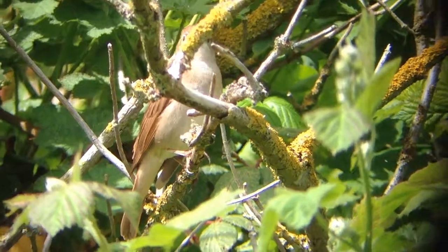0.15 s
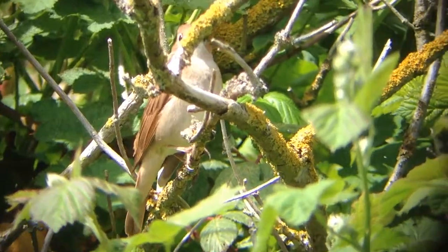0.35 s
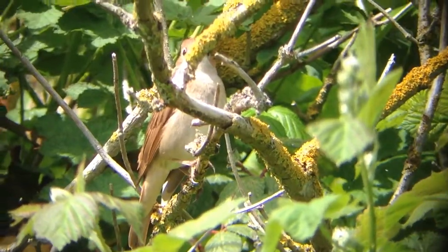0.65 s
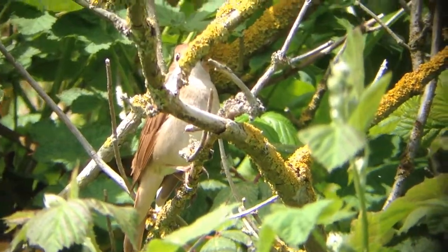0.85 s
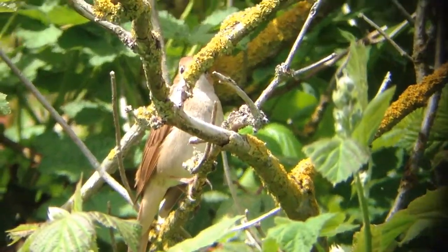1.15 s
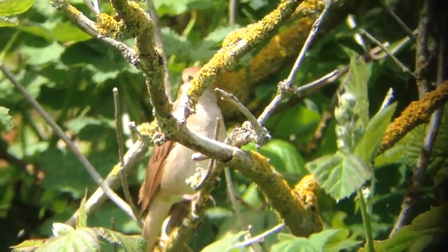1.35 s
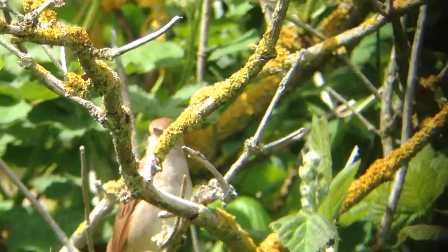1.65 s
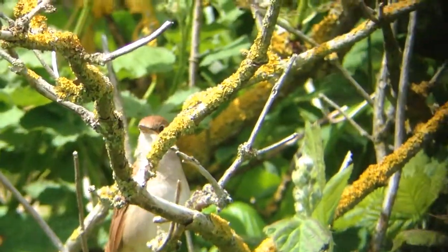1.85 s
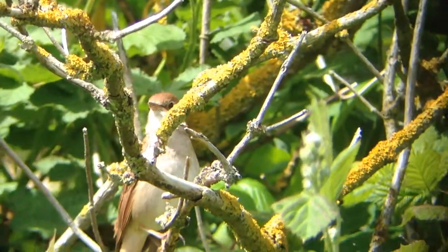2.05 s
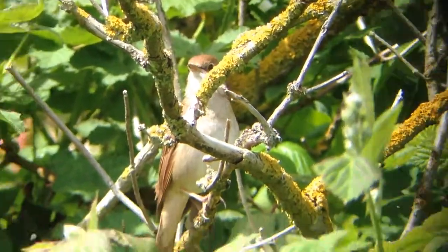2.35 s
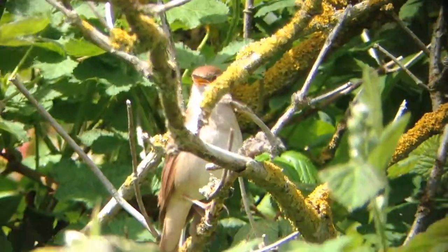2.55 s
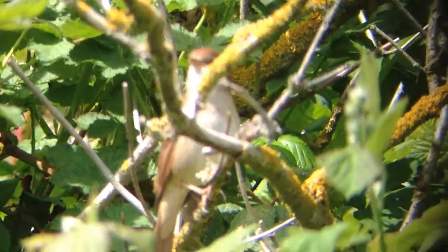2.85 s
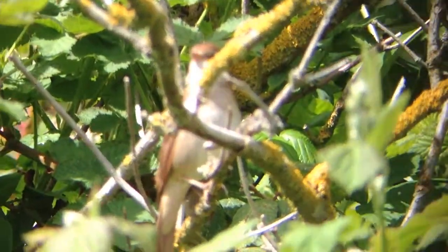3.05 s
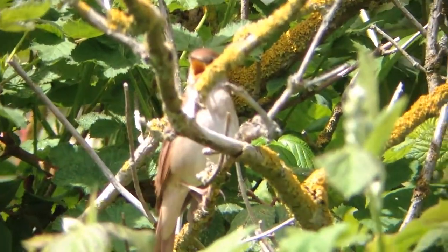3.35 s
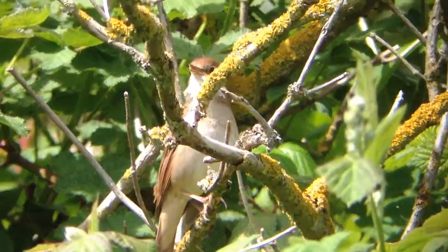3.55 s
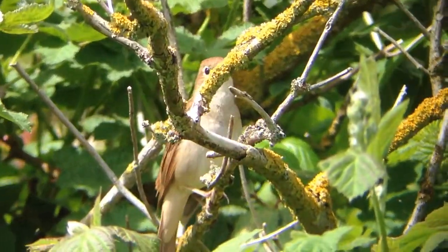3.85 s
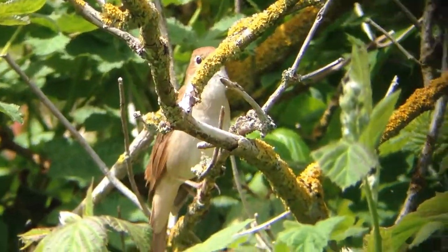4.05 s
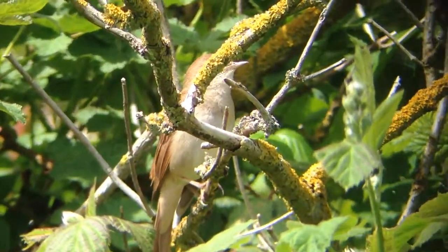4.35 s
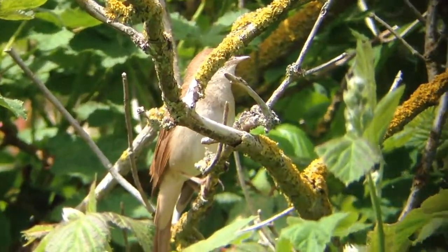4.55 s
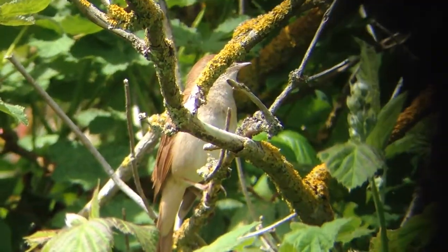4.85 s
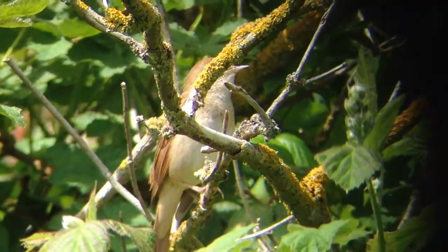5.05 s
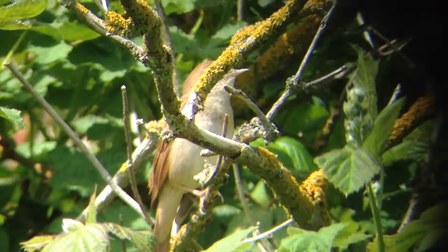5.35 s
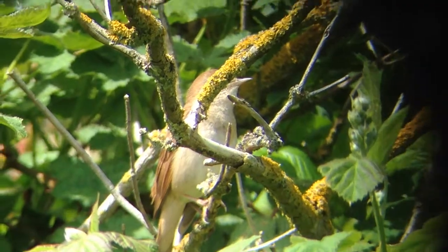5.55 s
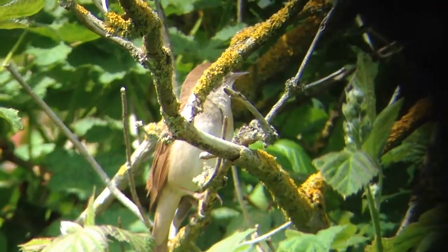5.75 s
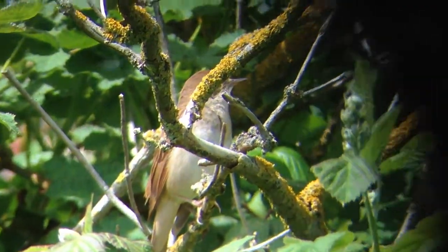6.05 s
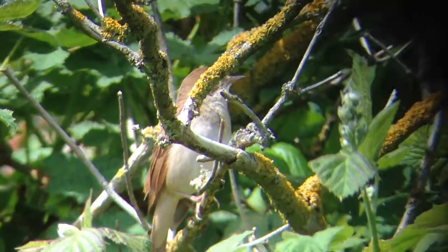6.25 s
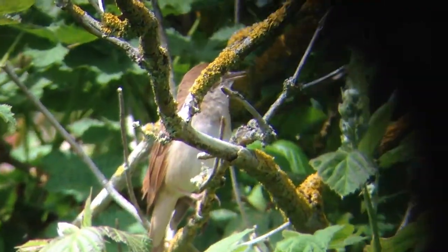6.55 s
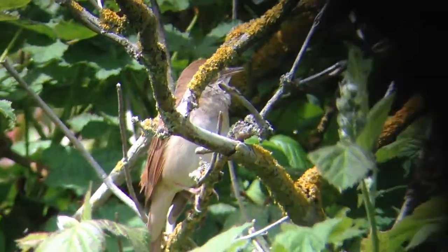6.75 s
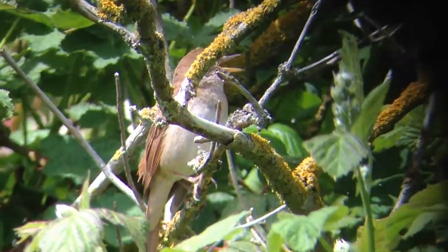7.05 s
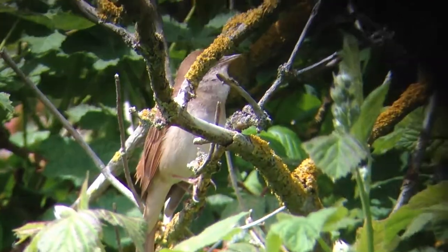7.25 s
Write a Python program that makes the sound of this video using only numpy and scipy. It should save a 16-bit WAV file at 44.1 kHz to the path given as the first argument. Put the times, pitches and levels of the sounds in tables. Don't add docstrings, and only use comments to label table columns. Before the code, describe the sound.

An outdoor thicket with a quiet bed: distant engine drone, soft traffic hush, low wind rumble and slight microphone hiss. At 0 to 0.4 s leaves crackle and rustle lightly; until 2.6 s only faint far birds whistle and chirp, one clearer at 2.2 s. At 2.6 s the nearby nightingale begins with a short, thin rising-falling whistle, then a dry rapid rattle from 2.8 to 3.0 s, a buzz at 3.1 s and a loud snapping upward whistle at 3.2 s. Five scratchy rasps follow at 3.3 to 3.55 s, a low purr at 3.7 s, then four loud, sharp downward double sweeps from 3.8 to 4.15 s and a very high flick at 4.26 s. Short woodland echo trails. From 4.5 to 7.4 s faint distant calls return, with a soft trill at 5.75 s and dull twig ticks near 5.6 and 6.8 s.

```python
import sys
import numpy as np
from scipy import signal
from scipy.fft import rfft, irfft, next_fast_len
from scipy.io import wavfile
from scipy.ndimage import uniform_filter1d, map_coordinates

SR = 44100
rng = np.random.default_rng(int(sys.argv[2]) if len(sys.argv) > 2 else 0)


def attenuation_scalar(level_db):
    decades = np.asarray(level_db, float) / 20
    return 10 ** decades


def bounce(signal):
    frames = np.transpose(np.atleast_2d(signal))
    limited = np.clip(frames, -1, 1)
    pcm = np.round(limited * 32767).astype(np.int16)
    wavfile.write(sys.argv[1], SR, pcm)


N = 326340

# (time [s], pitch [Hz], level [dB])
OPENING = [(2.603, 2627, -70), (2.617, 3100, -61), (2.626, 3650, -58), (2.63, 3900, -44),
           (2.637, 4024, -42), (2.652, 3790, -44), (2.662, 3574, -60), (2.68, 3460, -53), (2.7, 3420, -66)]
OPENING_TAIL = [(2.7, 3420, -70), (2.74, 3440, -66), (2.765, 3150, -66), (2.79, 2713, -74)]
CLIMB = [(3.215, 1780, -50), (3.222, 2190, -42.5), (3.2285, 2480, -35), (3.238, 2700, -43),
         (3.25, 2980, -43.5), (3.259, 3500, -52), (3.263, 3186, -63)]
TUMBLE = [(3.258, 2780, -62), (3.265, 2480, -37), (3.268, 2100, -44), (3.272, 1700, -45)]
SETTLE = [(3.27, 2770, -54), (3.28, 3120, -52), (3.291, 3080, -54), (3.313, 2950, -59)]
FLICK_HIGH = [(4.256, 3730, -55), (4.263, 4650, -44), (4.2675, 5750, -57), (4.271, 6700, -51.5),
              (4.276, 7751, -52.5), (4.282, 7900, -55), (4.29, 7640, -69)]
FLICK_LOW = [(4.267, 3560, -49), (4.273, 4200, -51.5), (4.279, 4840, -42), (4.286, 6000, -51)]
SLIDE = [(5.443, 5300, -72), (5.458, 4350, -66), (5.48, 3420, -58), (5.5, 2660, -60.5), (5.51, 2520, -62)]
PURR_END = [(3.728, 1640, -60), (3.736, 1620, -49), (3.741, 1610, -50), (3.749, 1600, -62)]
# (time after start [s], pitch [Hz], level [dB])
SWEEP_HOOK = [(0, 4600, -15), (.002, 3990, -6.5), (.0062, 3850, -1.5), (.009, 3480, -10.5),
              (.014, 2900, -11.5), (.018, 2600, -3), (.022, 2560, -3), (.027, 2700, -12), (.036, 2750, -19)]
SWEEP_DROP = [(0, 3750, -15), (.004, 3250, -10), (.008, 2930, -8.5), (.012, 2530, 0.5), (.016, 2250, -7.5),
              (.019, 1950, -1.5), (.022, 1740, -14)]
DROP_AFTER_S, LIFT_FADE_S = .034, 0.01124
# (time [s], level [dB], hook start lift [Hz], drop re hook [dB], drop start lift [Hz])
SWEEPS = [
    (3.799, -29, 10, -2.5, 8),
    (3.910, -29.5, 15, -1, -30),
    (4.021, -28.5, 340, -1.5, 300),
    (4.138, -29.5, 300, -4, -60),
]
HOOK_REST_HZ = [10, -55, 100, 45]
# (time [s], length [s], shake rate [1/s], centre [Hz], swing [Hz], level [dB])
PURR = (3.6725, .07, 96, 1712, 175, -39.2)
# (time [s], length [s], pulse rate [1/s], centre [Hz], level [dB])
BUZZ = [
    (3.069, 0.078, 82, 4850, -44.5),
    (3.1, .05, 94, 6250, -60),
    (3.078, 0.068, 66, 3950, -54),
    (3.078, 0.076, 83, 5340, -59),
]
RASP = [(3.335, 0.026, 183, 4630, -56), (3.379, .03, 180, 4350, -56), (3.425, 0.031, 186, 4600, -55.5),
        (3.478, 0.026, 177, 4510, -54.5), (3.528, 0.032, 179, 4660, -56.5)]
TRILL = [(5.735, 0.393, 17.9, 3380, -60)]
# (time [s], tick level [dB], tock level [dB])
RATTLE = [(2.813, -54.5, -63), (2.842, -55, -60), (2.866, -63, -58), (2.890, -59, -56), (2.913, -57, -52),
          (2.938, -57, -53), (2.963, -56, -55)]
TICK_HZ, TOCK_HZ, TOCK_AFTER_S = 2390, 2050, .0052
# (delay [s], level [dB])
BRANCH_ECHOES = [(.0019, -11), (.0043, -1), (.0071, -8), (0.011, -4.5)]

# (time [s], length [s], pitch [Hz], level [dB])
HELD = [(1.02, .04, 3110, -71), (1.055, .035, 3150, -66), (1.872, .014, 5200, -68), (1.96, .02, 4950, -72),
        (1.958, .02, 3900, -69), (2.098, .01, 3150, -65), (2.125, .01, 3650, -69), (2.32, .012, 3170, -68),
        (2.39, .05, 3700, -73), (2.46, .02, 2400, -68), (.645, .03, 3700, -76), (.75, .012, 3450, -65),
        (.773, .01, 2950, -65), (1.27, .11, 4280, -82), (6.955, .015, 2750, -70), (6.455, .035, 2150, -73),
        (6.665, .025, 2000, -69), (1.862, .01, 4300, -69), (1.912, .015, 3700, -65), (1.92, .04, 3450, -72),
        (1.96, .02, 4300, -67), (2.005, .02, 3280, -69), (2.198, .03, 3100, -71), (2.44, .03, 3200, -63),
        (2.869, .03, 3410, -72), (3.1, .08, 3230, -71), (3.287, .05, 4360, -68), (3.369, .07, 3200, -65),
        (3.562, .04, 3370, -62), (3.745, .02, 3350, -68), (3.765, .011, 2790, -65), (6.41, .075, 2700, -73),
        (6.67, .06, 3150, -74), (6.935, .025, 4200, -77), (6.9, .06, 1980, -75), (6.95, .015, 3150, -67),
        (6.986, .035, 2680, -66), (7.02, .04, 2620, -73), (7.353, .045, 3550, -76),
        (7.368, .016, 2600, -68), (7.265, .025, 2050, -72), (.247, .008, 3000, -68), (.133, .02, 2350, -70),
        (.18, .04, 2400, -70), (4.925, .015, 3550, -70)]
# (time [s], length [s], from [Hz], to [Hz],
# level [dB])
GLIDES = [(1.31, .09, 3400, 3280, -78), (1.33, .07, 3850, 3680, -79), (1.729, .014, 4300, 3400, -66),
          (1.781, .016, 4300, 2950, -66), (1.797, .008, 3500, 2900, -73), (1.915, .012, 3800, 2900, -70),
          (6.765, .01, 3000, 2300, -70), (.67, .03, 3400, 2670, -71), (.757, .018, 3500, 2950, -66),
          (2.24, .012, 3900, 3600, -70), (.51, .022, 3000, 2350, -72), (1.88, .022, 5000, 3150, -67),
          (1.9, .022, 3100, 3050, -70), (1.96, .02, 4900, 3700, -72), (2.965, .05, 2880, 2700, -68),
          (3.491, .035, 4500, 4110, -65), (3.598, .035, 3270, 2830, -63), (3.733, .052, 4300, 4000, -68),
          (6.175, .005, 5800, 5300, -73), (6.522, .018, 3550, 3120, -72), (6.592, .01, 3680, 3350, -69),
          (6.714, .022, 4450, 3800, -70), (6.72, .028, 3700, 3100, -66.5), (6.795, .02, 3550, 3250, -73),
          (6.955, .012, 4300, 2500, -71), (7.007, .012, 4300, 2400, -68), (6.345, .012, 4300, 3700, -76),
          (7.196, .068, 3500, 3200, -64),
          (1.41, .08, 3200, 3380, -77), (1.42, .07, 3800, 4000, -82), (7.0, .012, 3900, 4300, -72),
         (.925, .018, 3100, 3500, -72), (.95, .015, 3000, 3350, -72), (.562, .045, 3450, 3500, -76),
         (.605, .028, 3600, 3800, -74), (.674, .008, 4200, 4600, -71), (2.433, .045, 2400, 2800, -70),
         (2.225, .045, 4100, 4400, -73), (6.332, .014, 3200, 4200, -73), (6.503, .01, 3200, 3700, -72),
         (1.765, .016, 4150, 4550, -69), (2.14, .008, 3800, 5300, -69), (2.416, .07, 1740, 2150, -67),
         (3.543, .045, 2580, 2820, -65), (5.27, .03, 2950, 3250, -71), (5.516, .09, 2660, 2970, -75),
         (5.614, .055, 3130, 3440, -63), (5.65, .02, 3680, 3990, -68), (6.137, .007, 4900, 6100, -69),
         (6.166, .008, 5400, 6000, -66), (6.179, .007, 4800, 5400, -70), (6.222, .009, 5150, 5500, -66),
         (6.231, .007, 5550, 6050, -71), (6.246, .007, 5100, 5800, -70), (6.608, .03, 3750, 4100, -72),
         (6.65, .06, 4300, 4200, -79), (6.82, .16, 3080, 3400, -77), (7.15, .02, 2750, 2950, -65),
         (7.169, .012, 3150, 3450, -69), (7.18, .012, 7100, 7800, -76), (7.191, .013, 7800, 8050, -72)]
FAR_HOOKS = [(1.752, .016, 4600, 4200, -66), (1.98, .025, 3800, 3080, -66), (2.085, .014, 3550, 3300, -67),
             (2.2, .022, 2600, 1770, -55.5), (2.278, .055, 3330, 3130, -71), (2.358, .04, 3680, 3400, -71),
             (6.375, .022, 2950, 3300, -61), (6.393, .016, 3400, 2650, -66), (6.665, .015, 3390, 2730, -70),
             (6.991, .025, 2760, 3100, -67)]
HOOK_POWER = 3.5
# (time [s], length [s], foot [Hz], top [Hz], level [dB])
ARCHES = [(.455, .058, 3200, 3650, -72), (1.092, .12, 3070, 3930, -67)]
ARCH_TOP_AT, ARCH_UNDER_HZ = .42, 600
# (time after start [s], length [s], from [Hz], to [Hz], level [dB])
FIGURE = [
    (0, .018, 2950, 4300, -8),
    (.015, .04, 4300, 4250, -9),
    (.086, .026, 3450, 3470, -6),
]
FIGURE_HOOK = [
    (.066, .022, 3950, 3400, 1.5),
    (.027, .03, 4000, 2770, -1),
]
PEAK_UP = [(0.00096, 0.0248, 3100, 4050, -4.5)]
PEAK_DOWN = [(0.02, 0.028, 4020, 3620, 0)]
# (time [s], level [dB])
FIGURES = [(5, -67), (5.143, -65), (5.292, -63.5)]
PEAKED = [(4.688, -68.5), (4.885, -67.5)]

# (time [s], length [s],
# centre [Hz], width [Hz], level [dB])
RUSTLE = [(0, 0.0045, 3900, 1500, -51), (.006, 0.0056, 4100, 1800, -54.5), (.248, .005, 4000, 2500, -68),
          (.036, 0.007, 4500, 3500, -63), (.065, 0.053, 3480, 3500, -63), (0.142, 0.086, 3340, 3000, -63),
          (.184, .006, 3400, 3000, -59), (.29, .075, 4530, 3000, -68), (.298, 0.066, 3270, 1300, -59),
          (.308, 0.028, 2100, 800, -51.5), (.882, 0.0057, 4300, 1500, -64), (4.251, 0.02, 7160, 1300, -54),
          (4.514, 0.0055, 1900, 2500, -59.5), (4.522, .007, 1700, 2000, -57), (6.375, 0.05, 148, 300, -58),
          (6.4, 0.015, 700, 600, -58), (6.665, 0.019, 1500, 1500, -60), (6.765, 0.008, 856, 900, -51.5),
          (6.75, 0.044, 2000, 1800, -63), (2.203, 0.0067, 2150, 600, -58)]
# (time [s], peak level [dB], frequency [Hz])
TICKS = [(5.5751, -39.5, 720), (6.754, -46.5, 600), (6.77, -48, 750), (6.836, -51, 1000)]
TICK_HALF_WIDTH_S = .0008

# (time [s], level [dB])
ENGINE = [(0.0, -67), (0.12, -54), (0.47, -61), (5.98, -56), (7.4, -61)]
# (multiple of firing rate [1], level [dB])
ORDERS = [(1, -10), (2, -24), (3, -3), (4, -5), (5, -1.5), (6, -8), (7, -3), (8, 0.5), (9, -8), (10, -11.5),
          (11, -29)]
FIRING_HZ = 19.94
# (time [s], level [dB])
HUSH = [(0.0, -59), (0.14, -61.5), (0.31, -62.5), (1.13, -62), (2.97, -63), (6.74, -62.5), (7.28, -62.5),
        (7.4, -61)]
GUSTS = [(0.0, -62), (0.16, -54.5), (0.31, -70), (0.64, -64), (0.7, -71), (1.17, -58.5), (1.26, -62),
         (2.31, -68.5), (2.45, -56), (2.49, -70), (3.03, -70), (3.05, -55), (3.36, -67), (3.44, -52.5),
         (3.92, -59.5), (6.51, -59), (7.32, -63), (7.4, -56)]
# (frequency [Hz], density [dB])
TRAFFIC = [(53, -21), (90, -9), (129, -4.5), (323, -9), (470, -9), (1030, -11), (1990, -15.5),
           (2540, -22.5), (3440, -22.5), (4910, -30), (8000, -41.5), (10400, -43), (17600, -120)]
WIND = [(18, -28), (38, -7), (60, -1.5), (90, 2), (170, -9.5), (260, -49)]
# (time [s], length [s], centre [Hz], width [Hz], level [dB])
MURMUR = [(0, .3, 2350, 600, -71), (1.25, .5, 2300, 600, -73), (5.5, .55, 2600, 1000, -68),
          (5.51, .11, 2800, 450, -65), (6.3, .75, 3500, 1800, -73), (3.3, .4, 2500, 1500, -68),
          (2.2, .32, 3800, 1500, -72), (4.2, .25, 3000, 1500, -70), (.6, .2, 4300, 700, -75),
          (1.25, .27, 3800, 1200, -75), (1.0, .2, 80, 60, -60), (5.645, .05, 3300, 1400, -63),
          (6.94, .09, 3200, 1600, -66), (6.355, .06, 3000, 900, -66), (.05, .24, 3300, 2500, -69),
          (2.94, .12, 3000, 800, -68)]
# (time [s], length [s], from [Hz], to [Hz])
MASKED = [(2.635, .05, 4450, 5200), (2.665, .04, 4050, 4650), (3.795, .045, 5250, 5600),
          (3.83, .04, 4300, 4550), (3.908, .052, 4700, 5700), (3.92, .02, 5700, 6700),
          (3.94, .06, 4350, 4600), (4.032, .042, 5200, 6800), (4.04, .015, 6800, 7400),
          (4.045, .065, 4650, 5150), (4.15, .018, 5300, 6800), (4.16, .03, 4800, 5150),
          (4.27, .035, 8200, 8600)]


def unit(x):
    return x / np.sqrt(np.mean(x ** 2) + 1e-20)


def curves(rows):
    s, *cols = np.transpose(rows)
    return [np.interp(np.arange(N) / SR, s, c) for c in cols]


def wobble(rate_hz, size=N):
    knots = rng.standard_normal(int(size * rate_hz / SR) + 4)
    return map_coordinates(knots, [np.arange(size) * rate_hz / SR])


def noise(spectrum):
    f, db = np.transpose(spectrum)
    m = next_fast_len(N)
    hz = np.fft.rfftfreq(m, 1 / SR)
    gain = attenuation_scalar(np.interp(np.log(hz + 1), np.log(f), db, left=-120, right=-120))
    return unit(irfft(rfft(rng.standard_normal(m)) * gain, m)[:N])


def add(track, s, x):
    part = track[max(round(s * SR), 0):][:len(x)]
    part += x[:len(part)]


def tone(hz):
    return np.sqrt(2) * np.sin(2 * np.pi * np.cumsum(hz) / SR)


def arch(length_s, power):
    u = np.linspace(0, 1, max(round(length_s * SR), 8))
    return u, np.abs(np.sin(np.pi * u)) ** power


def bandpass(x, low_hz, high_hz):
    sos = signal.butter(3, [low_hz, high_hz], "bandpass", fs=SR, output="sos")
    return signal.sosfiltfilt(sos, x)


def running_rms(x, size):
    return np.sqrt(np.abs(uniform_filter1d(x ** 2, size)))


def song(edge_s=0.0017, overtone_db=-45):
    out = np.zeros(N)
    singles = [OPENING, OPENING_TAIL, CLIMB, TUMBLE, SETTLE, FLICK_HIGH, FLICK_LOW, SLIDE, PURR_END]
    for note in sweeps() + singles:
        s, hz, db = np.transpose(sorted(note))
        t = np.arange(s[0], s[-1], 1 / SR)
        pitch = uniform_filter1d(np.interp(t, s, hz), size=90, mode="nearest")
        level = uniform_filter1d(attenuation_scalar(np.interp(t, s, db)), size=60, mode="nearest")
        fade = np.clip(np.minimum(t - s[0], s[-1] - t) / edge_s, 0, 1)
        breath = attenuation_scalar(1.3 * wobble(300, size=len(t)))
        whistle = tone(pitch) + attenuation_scalar(overtone_db) * tone(2 * pitch)
        add(out, s[0], level * fade * breath * whistle)
    return out


def sweeps():
    def lifted(shape, start_s, db, lift_hz, rest_hz):
        points = []
        for t, hz, level in shape:
            early = np.exp(-(t / LIFT_FADE_S) ** 2)
            points.append((start_s + t, hz + lift_hz * early + rest_hz * (1 - early), db + level))
        return points

    notes = []
    for (s, db, hook_hz, under_db, drop_hz), rest_hz in zip(SWEEPS, HOOK_REST_HZ):
        notes.append(lifted(SWEEP_HOOK, s, db, hook_hz, rest_hz))
        notes.append(lifted(SWEEP_DROP, s + DROP_AFTER_S, db + under_db, drop_hz, 0))
    return notes


def purr(dip=.72, power=.95, lean_rad=.12):
    s, length, rate, hz, swing_hz, db = PURR
    u, swell = arch(length, power)
    turn = 2 * np.pi * u * length * rate
    out = np.zeros(N)
    effort = attenuation_scalar(db - 3 + 1.1 * wobble(200, size=len(u))) * swell
    level = effort * (1 - dip * np.cos(turn - lean_rad))
    add(out, s, level * tone(hz - swing_hz * (.55 + .45 * swell) * np.cos(turn)))
    return out


def pulsed(rows, sweep_hz, duty, scatter_db, power, jitter_hz=0, fade_db=0):
    out = np.zeros(N)
    for s, length, rate, hz, db in rows:
        u, swell = arch(length, power)
        turns = u * length * rate
        inside = np.clip(turns % 1 / duty, 0, 1)
        size = attenuation_scalar(scatter_db * rng.standard_normal(40))[turns.astype(int)]
        pitch = hz + sweep_hz * (inside - .5) + jitter_hz * wobble(1303, size=len(u))
        add(out, s, attenuation_scalar(db + fade_db * u) * swell * size * np.sin(np.pi * inside) * tone(pitch))
    return out


def buzzes():
    upper = [(s, length, rate, 1.5 * hz, db - 10.5) for s, length, rate, hz, db in RASP]
    rattle = []
    for s, tick_db, tock_db in RATTLE:
        rattle.append((s, .025, 40, TICK_HZ, tick_db))
        rattle.append((s + TOCK_AFTER_S, .025, 40, TOCK_HZ, tock_db))
    return (pulsed(BUZZ, sweep_hz=500, duty=.99, scatter_db=1.5, power=0.5, jitter_hz=260, fade_db=-8.0)
            + pulsed(RASP, sweep_hz=-900, duty=0.67, scatter_db=1, power=0.43, jitter_hz=510)
            + pulsed(upper, sweep_hz=-600, duty=0.61, scatter_db=3, power=.4, jitter_hz=300)
            + pulsed(rattle, sweep_hz=-400, duty=.22, scatter_db=0, power=.05, jitter_hz=60)
            + pulsed(TRILL, sweep_hz=-1500, duty=0.36, scatter_db=0.0, power=0.13))


def thicket(x, early_db, tail_db, t60_s, far_db, count=4, turn_s=.012):
    echoes = np.zeros(SR // 20)
    echoes[0] = 1
    for delay, db in BRANCH_ECHOES:
        echoes[round(delay * SR)] += attenuation_scalar(db + early_db)
    knots = np.arange(0, N / SR + 1, turn_s)
    pick = rng.integers(count, size=len(knots))
    tails = np.zeros(N)
    for k in range(count):
        share = np.sqrt(np.interp(np.arange(N) / SR, knots, pick == k))
        tails += signal.fftconvolve(x * share, tail(t60_s, far_db))[:N]
    return signal.fftconvolve(x, echoes)[:N] + attenuation_scalar(tail_db) * tails


def tail(t60_s, far_db):
    t = np.arange(SR // 2) / SR
    low, high, far = rng.standard_normal((3, len(t))) * attenuation_scalar(4 * wobble(700, size=len(t)))
    low = signal.sosfilt(signal.butter(2, [2100, 4200], "bandpass", fs=SR, output="sos"), low)
    mix = low * attenuation_scalar(-60 * t / t60_s)
    mix += .6 * high * attenuation_scalar(-60 * t / (.45 * t60_s))
    mix += attenuation_scalar(far_db - 60 * t / .9) * far
    mix = mix * np.clip(t / .008, 0, 1)
    return mix / np.linalg.norm(mix)


def neighbours(flutter_db=2.4):
    out = np.zeros(N)
    for s, length, start_hz, end_hz, db, rule in far_notes():
        u, swell = arch(length, .25)
        pitch = rule(u, start_hz, end_hz)
        level = attenuation_scalar(db + .7 + flutter_db * wobble(230, size=len(u))) * swell
        add(out, s, level * tone(pitch + 28 * wobble(250, size=len(u))))
    return out


def even(u, a_hz, b_hz):
    return a_hz + (b_hz - a_hz) * u


def hook(u, a_hz, b_hz):
    return b_hz + (a_hz - b_hz) * (1 - u) ** HOOK_POWER


def bow(u, foot_hz, top_hz):
    rise = (top_hz - foot_hz) * (1 - u / ARCH_TOP_AT) ** 2
    past_top = np.abs((u - ARCH_TOP_AT) / (1 - ARCH_TOP_AT))
    fall = (top_hz - foot_hz + ARCH_UNDER_HZ) * past_top ** 2.4
    return top_hz - np.where(u < ARCH_TOP_AT, rise, fall)


def repeated(figure, calls):
    return [(s + t, length, a, b, db + level) for s, db in calls for t, length, a, b, level in figure]


def far_notes():
    held = [(s, length, hz, hz, db) for s, length, hz, db in HELD]
    glides = held + GLIDES + repeated(FIGURE, FIGURES) + repeated(PEAK_UP, PEAKED)
    hooks = FAR_HOOKS + repeated(FIGURE_HOOK, FIGURES) + repeated(PEAK_DOWN, PEAKED)
    return [(*row, rule) for rows, rule in ((glides, even), (hooks, hook), (ARCHES, bow)) for row in rows]


def puffs(rows, lumps_db, lump_rate_hz):
    out = np.zeros(N)
    for s, length, hz, width_hz, db in rows:
        u, swell = arch(length, .8)
        b, a = signal.iirpeak(hz, hz / width_hz, SR)
        grains = rng.standard_normal(len(u)) * attenuation_scalar(lumps_db * wobble(lump_rate_hz, size=len(u)))
        burst = signal.lfilter(b, a, signal.lfilter(b, a, grains))
        add(out, s, attenuation_scalar(db) * swell * unit(burst))
    return out


def twigs():
    out = puffs(RUSTLE, lumps_db=3, lump_rate_hz=500)
    t = np.arange(-200, 200) / SR
    for s, db, hz in TICKS:
        swing = np.exp(-(t / TICK_HALF_WIDTH_S) ** 2) * np.cos(2 * np.pi * hz * t)
        add(out, s + t[0], -attenuation_scalar(db) * swing)
    return out


def engine():
    level_db, = curves(ENGINE)
    firing = FIRING_HZ * (1 + 0.0022 * wobble(2.97))
    orders = np.zeros(N)
    for k, db in ORDERS:
        orders += attenuation_scalar(db + 2.9 * wobble(1.88)) * np.roll(tone(k * firing), rng.integers(-90, 90))
    return attenuation_scalar(level_db - 3) * unit(orders)


def distance():
    (traffic_db,), (wind_db,) = curves(HUSH), curves(GUSTS)
    traffic = attenuation_scalar(traffic_db + 2.5 + .35 * wobble(4.89)) * noise(TRAFFIC)
    wind = attenuation_scalar(wind_db - 1 + 1.5 * wobble(5.7)) * noise(WIND)
    return engine() + traffic + wind + puffs(MURMUR, lumps_db=2, lump_rate_hz=60)


def scene():
    singer = song() + buzzes() + attenuation_scalar(-6) * purr()
    near = thicket(singer, early_db=-11, tail_db=-14.5, t60_s=.22, far_db=-21)
    far = thicket(neighbours(), early_db=-13, tail_db=-12, t60_s=.22, far_db=-22)
    direct_purr = attenuation_scalar(-6) * purr()
    return (near + direct_purr + far + twigs() + distance())[None]


def unmasked(x, depth=.97):
    out = x.copy()
    for s, length, low_hz, high_hz in MASKED:
        u, swell = arch(length, .25)
        near = x[0, round(s * SR) - 2000:][:len(u) + 4000]
        add(out[0], s, -depth * swell * bandpass(near, low_hz, high_hz)[2000:-2000])
    return out


def top_cut(x):
    return signal.sosfilt(signal.butter(12, 15510, fs=SR, output="sos"), x)


def record(dry):
    x = dry + attenuation_scalar(-71) * noise([(2000, -22), (4000, 1.5), (8000, 1.0), (15600, 1)])
    x = unmasked(x)
    top = noise([(11500, -8), (13000, -3), (14500, 2), (15400, 1)])
    x = x + attenuation_scalar(-10.5) * running_rms(bandpass(dry, 6000, 8200), size=200) * top
    x = signal.sosfiltfilt(signal.ellip(8, .1, 60, 15330, fs=SR, output="sos"), x)
    return top_cut(x)


dry = scene()
out = record(dry)
bounce(out)
```